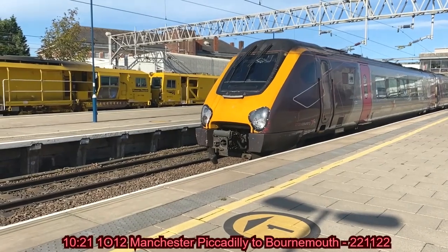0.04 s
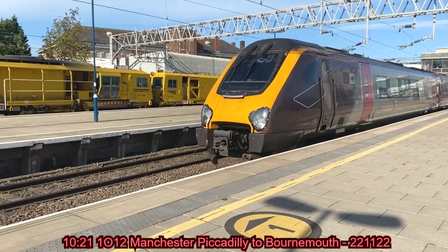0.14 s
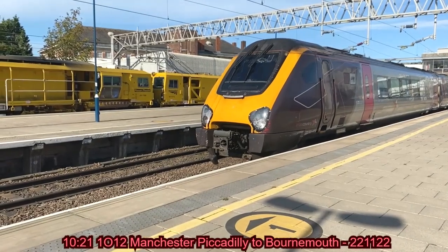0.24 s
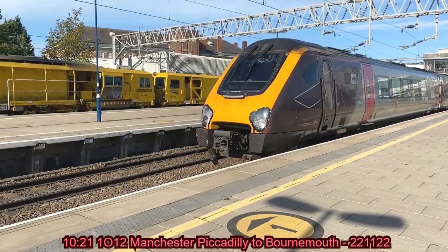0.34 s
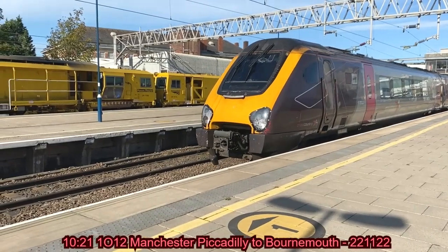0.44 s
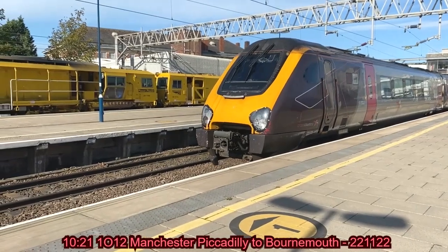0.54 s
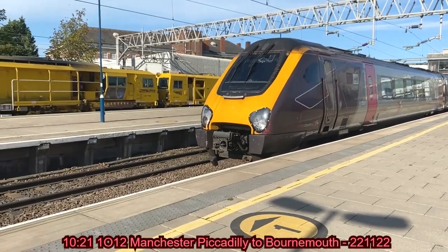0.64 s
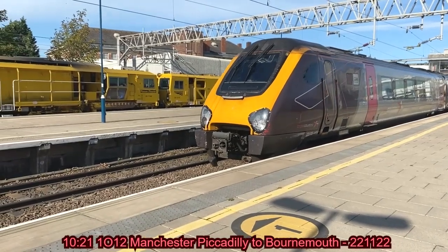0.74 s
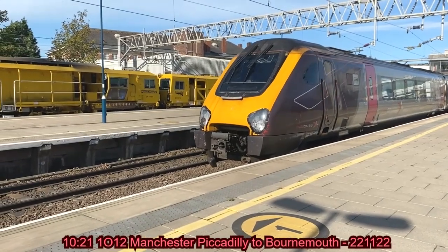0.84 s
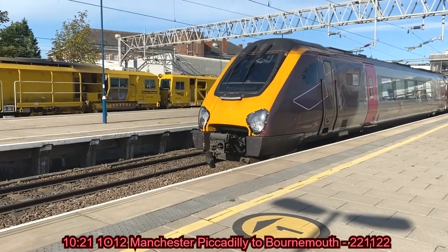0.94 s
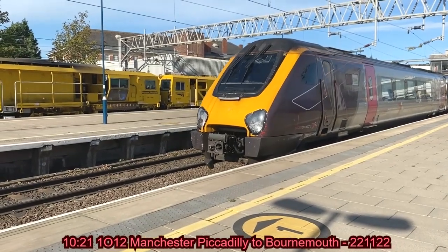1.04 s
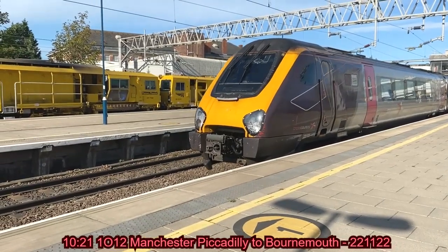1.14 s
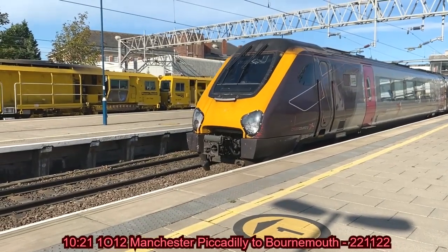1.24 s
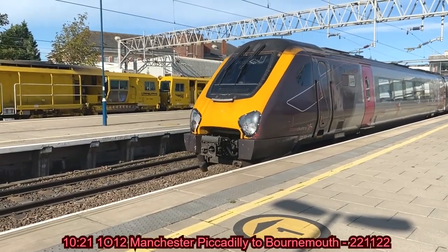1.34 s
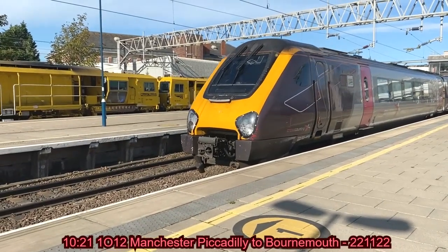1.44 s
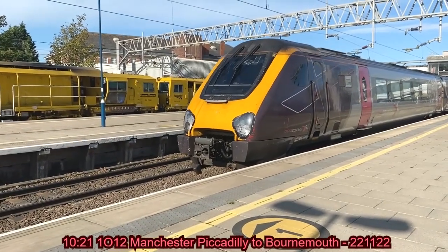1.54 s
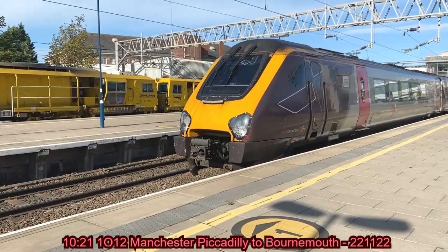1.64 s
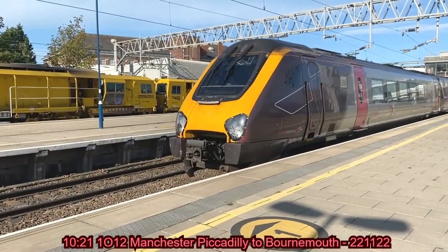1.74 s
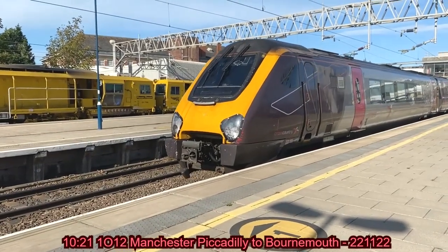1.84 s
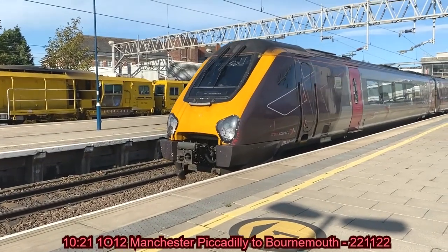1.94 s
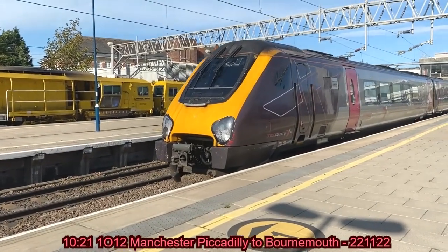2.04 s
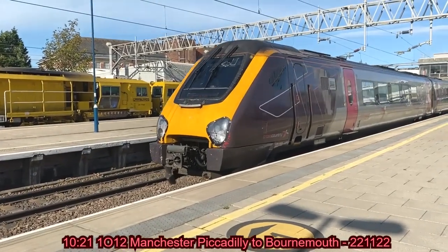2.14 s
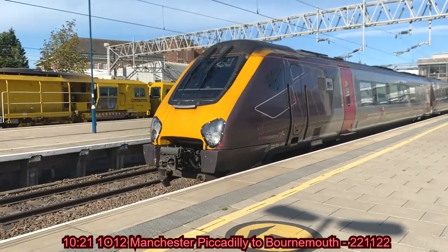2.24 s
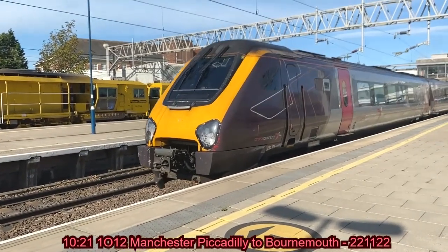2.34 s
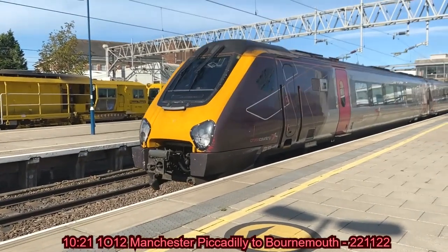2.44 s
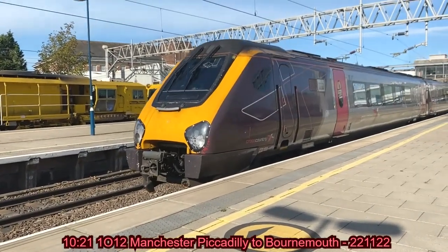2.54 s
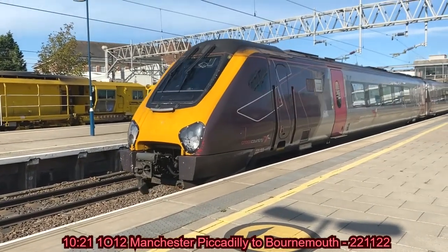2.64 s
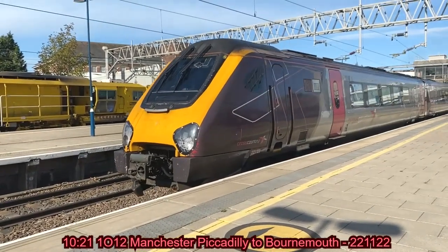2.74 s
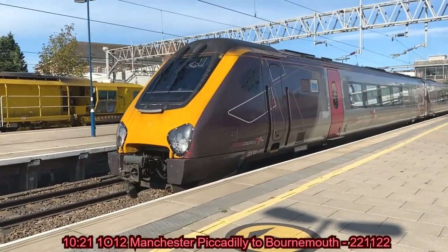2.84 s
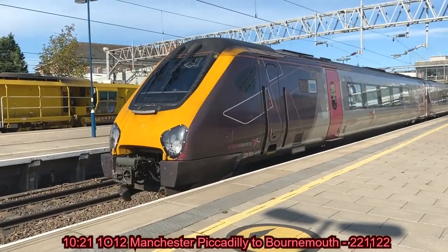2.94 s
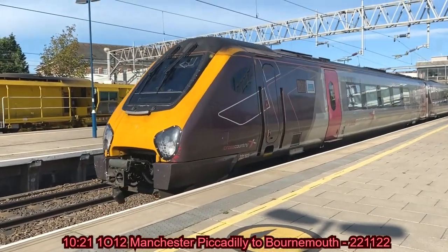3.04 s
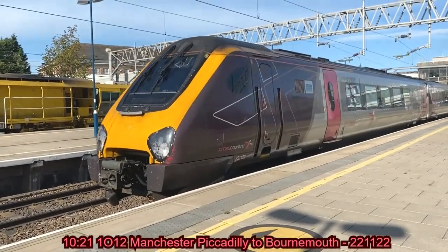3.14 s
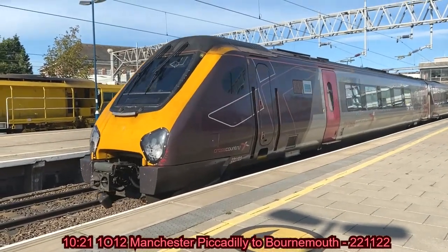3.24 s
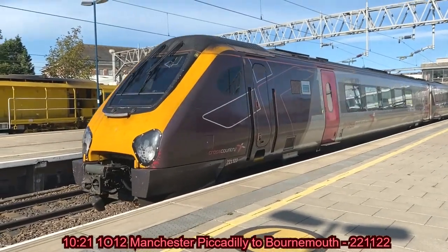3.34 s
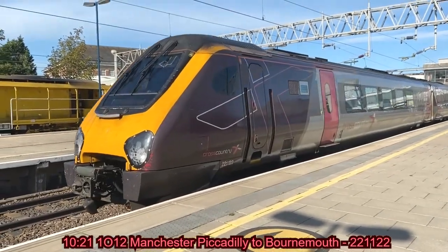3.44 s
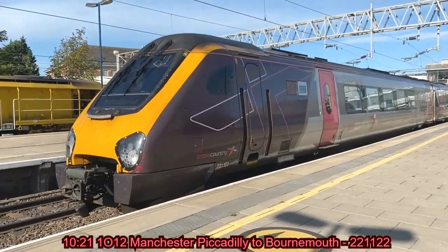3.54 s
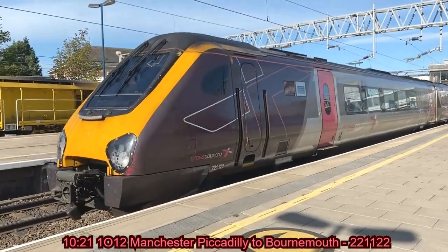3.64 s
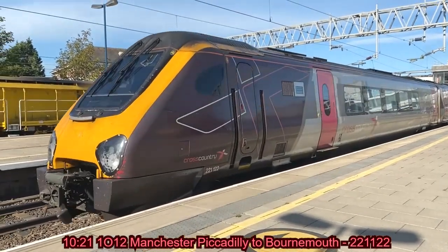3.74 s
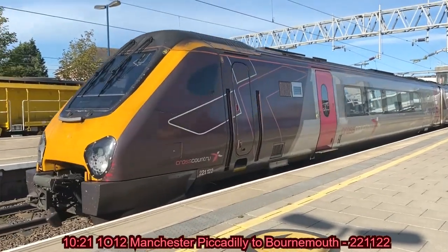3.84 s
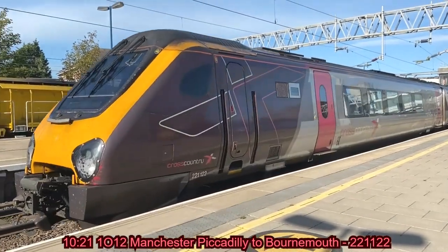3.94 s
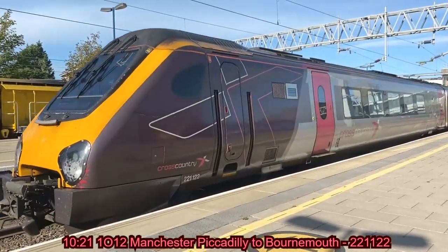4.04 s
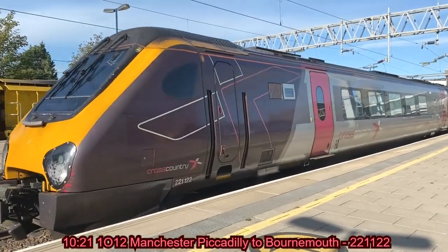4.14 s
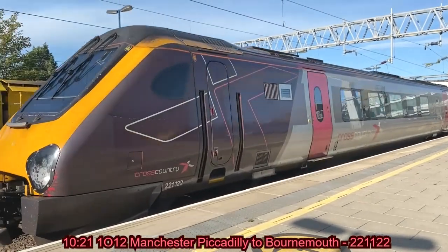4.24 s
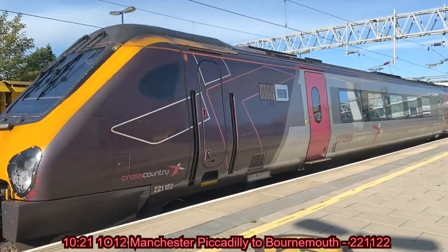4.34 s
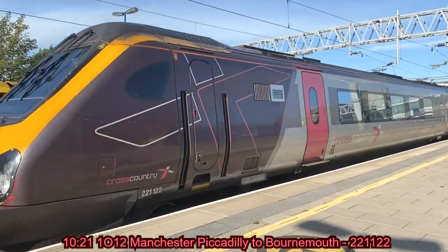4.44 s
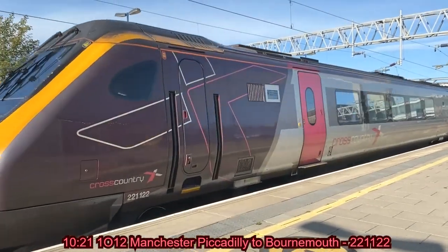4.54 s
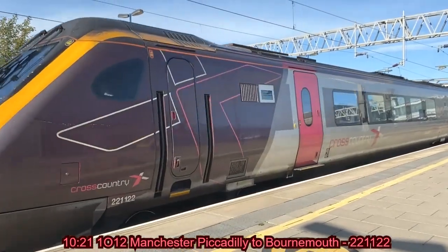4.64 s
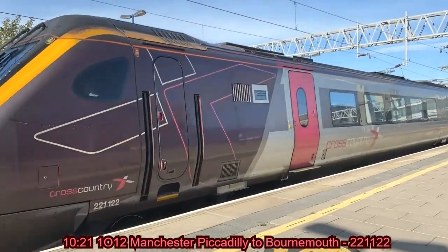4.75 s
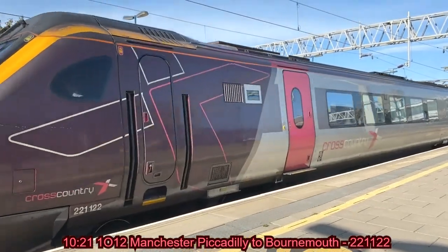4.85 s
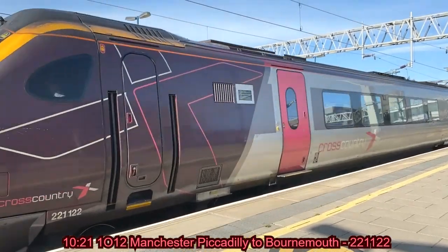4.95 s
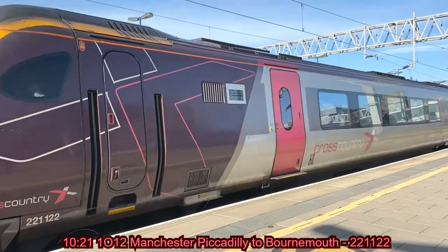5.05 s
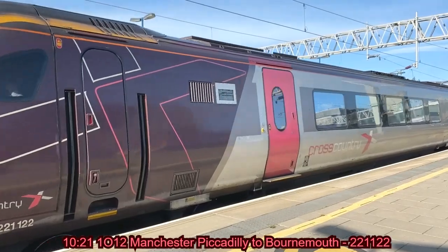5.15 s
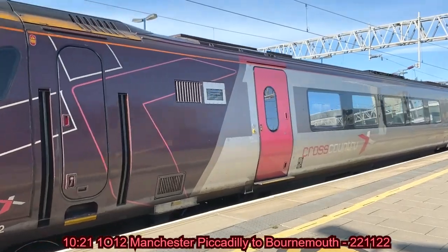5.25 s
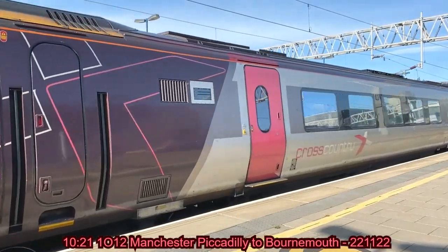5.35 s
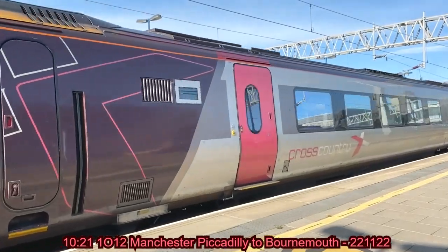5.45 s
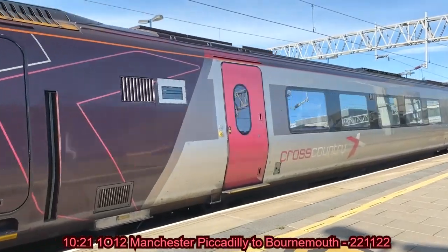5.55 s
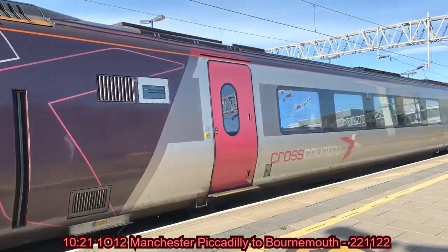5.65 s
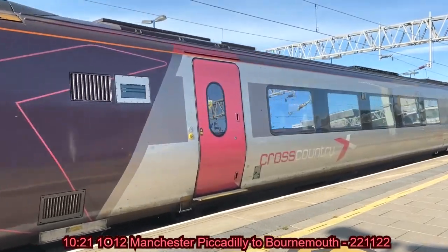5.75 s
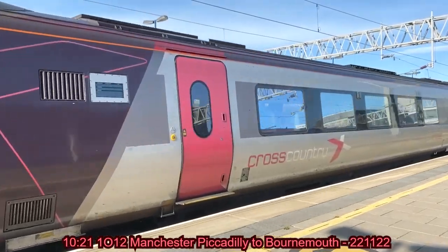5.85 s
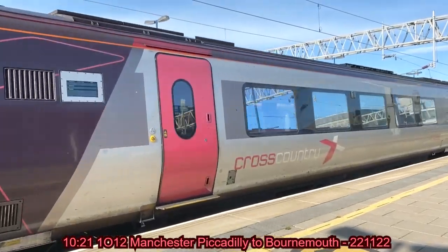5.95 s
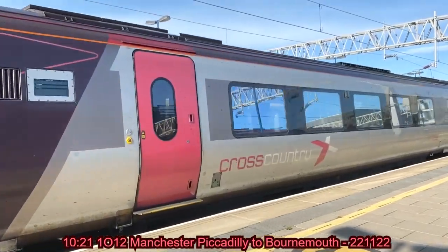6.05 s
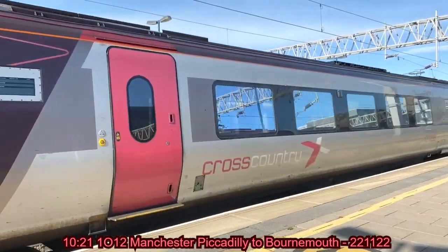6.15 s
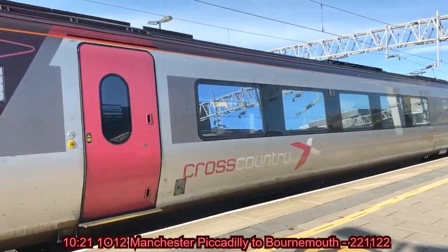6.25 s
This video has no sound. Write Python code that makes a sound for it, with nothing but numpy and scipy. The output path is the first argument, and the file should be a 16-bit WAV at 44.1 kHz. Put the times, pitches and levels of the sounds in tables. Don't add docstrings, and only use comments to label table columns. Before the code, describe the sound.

A diesel passenger train moves past a stereo listener on an open station platform. From 0 to 1 second its underfloor engines hold a low, heavy drone, nearly steady, over soft fan roar, faint machine whines and barely noticeable mains hum. From about 1 second the engines rev up, the pitch climbing smoothly by roughly a musical fifth by the end. The exhaust throbs irregularly: slightly mismatched engines beat together, with brief dips and swells and a rough, buzzing edge. Between 3.5 and 4.5 seconds the front draws close and the roar's colour shifts; the cooling tones fade while motor and gear whine rises slightly. The hum disappears by about 5 seconds. From 5 to 6.3 seconds the rumble, wide turbulent roar and high hiss swell strongest, the climb easing off as the sound ends mid-pass.

```python
import sys
import numpy as np
from scipy import signal
from scipy.io import wavfile
from scipy.ndimage import uniform_filter1d, minimum_filter1d

SR = 44100
rng = np.random.default_rng(int(sys.argv[2]) if len(sys.argv) > 2 else 0)


def convert_level_to_amplitude(level_db):
    exponent = np.asarray(level_db, float) / 20
    return 10 ** exponent


def bounce(signal):
    frames = np.transpose(np.atleast_2d(signal))
    limited = np.clip(frames, -1, 1)
    pcm = np.round(limited * 32767).astype(np.int16)
    wavfile.write(sys.argv[1], SR, pcm)


N = 277830
TIME = np.arange(N) / SR
HOP, WINDOW = 512, 2048
FRAMES, BIN_HZ = N // HOP + 5, np.fft.rfftfreq(WINDOW, 1 / SR)
FRAME_TIME = np.arange(FRAMES) * HOP / SR


def evened(x):
    return x / np.sqrt(np.mean(abs(x) ** 2) + 1e-20)


def read(points, hz):
    f, value = np.transpose(points)
    return np.interp(np.log(hz + 1), np.log(f + 1), value)


def curves(rows, t):
    s, *columns = np.transpose(rows)
    return [np.interp(t, s, column) for column in columns]


def wobble(width_hz):
    step = 64
    r = np.exp(-np.pi * width_hz * step / SR)
    z = rng.standard_normal((N // step + 2000, 2)) @ [1, 1j]
    z = signal.lfilter([1], [1, -2 * r, r * r], z)
    z = evened(z[1990:])
    return np.interp(np.arange(N) / step, np.arange(len(z)), z)


def resonance(modes, hz):
    return sum(top / (1 + (2 * (hz - f) / width) ** 2) for f, width, top in modes)


# t/s, firing rate f/Hz, load level/dB
REV = [(0, 57.05, -4.5), (.5, 57.52, -5), (1, 59.03, -3), (1.5, 62.37, -1), (2, 65.7, 0), (2.5, 68.6, -1.5),
       (3, 71.03, 0.5), (3.5, 72.44, -0.5), (4, 74.78, 1.5), (4.5, 77.05, 3), (5, 79.26, 0.5),
       (5.5, 82.34, 0), (6, 84.3, -0.5), (6.3, 84.6, -2.5)]
# t/s, lag/rad
PULSE_LAG = [(0, -.4), (1, -.5), (1.6, -1.3), (3.5, -2.1), (6.3, -1.8)]


def crank():
    hz, load_db = curves(REV, TIME)
    turn = 2 * np.pi * np.cumsum(hz) / SR
    return hz, load_db, turn, curves(PULSE_LAG, TIME)[0]


# f/Hz, width/Hz, level/dB
PIPE = [(75, 22, 1), (137.7, 15.4, 14), (158, 7, 3), (195.9, 24, 15), (243.8, 31.4, 17)]


def order_level(k, row, hz, load_db):
    db, pipe_share, load_share = row
    return db + pipe_share * resonance(PIPE, k * hz) + load_share * load_db


# level/dB between modes, share of the pipe lift, share of the load
FIRING = [
    (-16.5, 0.31, 1.33),
    (-17.5, 0.21, 1.57),
    (-30, 0.59, .6),
    (-41, 0.87, .1),
]


def firing_levels(hz, load_db):
    return [order_level(k, row, hz, load_db) for k, row in enumerate(FIRING, 1)]


# t/s, length/s, level/dB
BEATS = [
    [(.17, 0.11, -17), (.45, 0.065, -14), (1.27, 0.17, -7), (1.65, .2, 0), (2.03, 0.077, -16),
     (3.64, 0.11, -19.5), (4.22, 0.069, -23), (4.62, .08, -6), (5.1, 0.067, -2), (5.5, 0.09, -16),
     (5.72, 0.054, -6.5), (6, .4, 0)],
    [(1.4, 0.079, -3.5), (2.45, 0.033, -4.5), (3.05, 0.078, -14), (3.6, 0.37, 5), (4.5, 0.17, -3),
     (4.77, 0.085, -6.5), (5.15, 0.29, 7.5), (5.85, 0.14, -7)],
    [(.12, 0.069, -12), (.7, 0.37, 2.5), (1.62, .14, -4.5), (2.1, 0.26, 3), (2.85, 0.058, -13),
     (4.3, 0.26, -6.5), (5.02, 0.052, -17)],
    [(.75, .3, 2), (1.5, 0.27, -9), (5.7, 0.26, 9.5)],
]


def firing_orders(levels, turn, lag):
    out = np.zeros(N)
    for k, (db, beats) in enumerate(zip(levels, BEATS), 1):
        beat_db = sum(depth * np.exp(-((TIME - s) / length) ** 2) for s, length, depth in beats)
        unsteady = 1 + .04 * wobble(width_hz=6)
        out += convert_level_to_amplitude(db + beat_db) * (np.exp(1j * (k * turn + lag)) * unsteady).real
    return out


# t/s, speed over that of the front engines, level/dB below them
REAR = [(0, 0.98, -18), (1, 1, -8), (2, 0.97, -8.5), (3, 1, -12), (4, 0.96, -11.5), (5, 0.97, -11.5),
        (6.3, 0.96, -10.5)]


def rear_engine(levels, hz):
    slower, under_db = curves(REAR, TIME)
    behind = 2 * np.pi * np.cumsum(hz * slower) / SR
    out = np.zeros(N)
    for k, db in enumerate(levels[:3], 1):
        first_cut_db = 4.7 * (k == 1)
        unsteady = 1.13 + .5 * wobble(width_hz=1.3)
        out += convert_level_to_amplitude(db + under_db - first_cut_db) * (np.exp(1j * k * behind) * unsteady).real
    return out


# level/dB between modes, share of the pipe lift, share of the load
THIRDS = [
    (-39, 0.97, 0.65),
    (-46, 1.31, 0.079),
    (-37.5, 0.82, 0.43),
    (-40.5, 0.91, 0.41),
]


def crank_orders(hz, load_db, turn, lag):
    scatter = np.clip(1.2 - TIME / 4, .35, 1)
    out = np.zeros(N)
    for k, row in zip((5 / 3, 7 / 3, 8 / 3, 10 / 3), THIRDS):
        phase = k * turn + lag + scatter * rng.uniform(-np.pi, np.pi)
        out += convert_level_to_amplitude(order_level(k, row, hz, load_db)) * np.cos(phase)
    return out


# f/Hz, width/Hz, level/dB
SILENCER = [(197.8, 10.9, 9), (237, 16, 7), (323.3, 7.2, 1.5)]
# sixths of the firing rate, level/dB
UNEVEN = [(3, -46.5), (4, -39), (5, -35), (7, -47.5), (8, -55), (9, -40.5), (11, -45.5), (13, -52),
          (15, -43.5), (17, -38), (19, -49), (21, -42), (22, -43), (23, -46), (26, -45.5), (28, -50),
          (30, -46.5), (36, -45.5)]


def uneven_orders(hz, turn):
    out = np.zeros(N)
    for sixths, db in UNEVEN:
        k = round(sixths) / 6
        swing = np.exp(1j * (k * turn + 2 * np.pi * rng.random()))
        unsteady = .85 + .5 * wobble(width_hz=1.4)
        out += convert_level_to_amplitude(db + resonance(SILENCER, k * hz)) * (swing * unsteady).real
    return out


def engines():
    hz, load_db, turn, lag = crank()
    levels = firing_levels(hz, load_db)
    out = firing_orders(levels, turn, lag) + rear_engine(levels, hz)
    out += crank_orders(hz, load_db, turn, lag) + uneven_orders(hz, turn)
    return np.sqrt(2) * out


# t/s, roar level/dB, nearness of the first engine (0-1)
PASS = [(0, -31.5, 0.08), (.8, -31.5, 0), (2.4, -30.5, 0), (3.2, -30, 0.05), (3.7, -29.5, 0.24),
        (4.2, -29, 0.76), (4.7, -29, 0.65), (5.2, -27, 0.82), (5.7, -27, 0.85), (6.3, -24.5, 0.85)]


def passing(t):
    roar_db, near = curves(PASS, t)
    return roar_db, np.clip(near, 0, 1), roar_db + 32


def field(patchy_db):
    a, b, patches, ridges = rng.standard_normal((FRAMES, len(BIN_HZ), 4)).T
    patches = uniform_filter1d(uniform_filter1d(patches, size=7, axis=0), size=14, axis=1)
    ridges = uniform_filter1d(uniform_filter1d(ridges, size=3, axis=0), size=40, axis=1)
    return (a + 1j * b) * convert_level_to_amplitude(patchy_db * evened(patches) + 1.8 * evened(ridges))


def levelled(shape, db):
    return shape / np.linalg.norm(shape, axis=0) * convert_level_to_amplitude(db)


def blend(far, close, near):
    return convert_level_to_amplitude(read(far, BIN_HZ)[:, None] * (1 - near) + read(close, BIN_HZ)[:, None] * near)


# f/Hz, level/dB per Hz
FAR_MID = [(160, -40), (280, -11), (392, -1.5), (529, -11), (629, -22), (838, -5.5), (1100, -12.5),
           (1400, -22), (1710, -16), (2100, -23), (2570, -20), (2840, -27.5), (3060, -25), (5500, -37.5),
           (7150, -56), (12000, -120)]
NEAR_MID = [(160, -37), (280, -8), (329, -2.5), (407, -8.5), (556, -13), (740, -25.5), (859, -19),
            (926, -26), (1020, -16), (1170, -17), (1560, -25), (2060, -27), (2770, -31.5), (3300, -33.5),
            (5500, -43), (7150, -73), (12100, -120)]
FAR_SIDE = [(35, -32.5), (60, -5.5), (76, -2.5), (91, -16.5), (133, -5.5), (159, -5.5), (194, -4.5),
            (390, -12), (440, -21.5), (815, -9.5), (918, -13.5), (1740, -21.5), (2340, -26), (2640, -26),
            (7000, -45), (9100, -75.5), (15400, -120)]
NEAR_SIDE = [(35, -39.5), (60, -7), (88, -5), (111, -21), (153, -1), (247, -1), (505, -16.5), (558, -15),
             (723, -18.5), (1540, -21.5), (1840, -24.5), (2800, -30), (7000, -47), (9100, -70.5),
             (15400, -120)]
# f/Hz, likeness
LEAN = [(200, -.2), (400, -.2), (700, .3), (1300, 0.24), (2400, .06), (4400, .1), (8000, 0)]


def roar(roar_db, near):
    one, other = field(.7), field(.7)
    widening = -.5 * np.sin(2 * np.pi * (BIN_HZ - 650) / 730) * (BIN_HZ > 300) * (BIN_HZ < 3600)
    lean = np.clip(read(LEAN, BIN_HZ), -.6, .6) + 1j * np.clip(widening, -.7, .7)
    lean = lean[:, None]
    mid = levelled(blend(FAR_MID, NEAR_MID, near), roar_db + .5) * one
    mixed = lean * one + np.sqrt(1 - abs(lean) ** 2) * other
    side = levelled(blend(FAR_SIDE, NEAR_SIDE, near), roar_db - .5) * mixed
    return np.array([mid + side, mid - side])


# f/Hz, level/dB per Hz
RUMBLE = [(20, -58), (40, -15), (55, -3), (90, -2), (140, -1), (200, 0), (260, -3), (320, -10), (420, -30),
          (600, -70)]


def rumble(rise_db):
    return levelled(convert_level_to_amplitude(read(RUMBLE, BIN_HZ))[:, None], -28 + .9 * rise_db) * field(.3)


# f/Hz, level/dB per Hz
HISS = [(4000, -35.5), (5200, 7.5), (6500, 8.5), (8000, 6.5), (11000, 2), (14000, -1), (15500, -5),
        (15800, -58.5)]


def hiss(rise_db):
    sound = levelled(convert_level_to_amplitude(read(HISS, BIN_HZ))[:, None], -56.5 + 1.46 * rise_db) * field(1.1)
    lead = np.exp(-1j * np.pi * (BIN_HZ - 6900) / 4250)[:, None]
    return np.array([sound * lead, sound / lead])


def broadband():
    roar_db, near, rise_db = passing(FRAME_TIME)
    z = roar(roar_db, near) + rumble(rise_db) + hiss(rise_db)
    return 1.241 * signal.istft(z, nperseg=WINDOW, noverlap=WINDOW - HOP)[1][:, :N]


def whine(hz, db, width_hz):
    carrier = np.sqrt(2) * convert_level_to_amplitude(db) * np.exp(2j * np.pi * np.cumsum(hz) / SR)
    mid, side = wobble(width_hz), .6 * wobble(width_hz)
    return (carrier * np.array([mid + side, mid - side])).real


# t/s, f/Hz, level/dB
TURBO = [(0, 3669, -56), (1.3, 3810, -62.5), (3.2, 4250, -79.5), (4.3, 4770, -64), (5.4, 5500, -63),
         (6.3, 5614, -58)]
# first f/Hz, last f/Hz, width/Hz, far level/dB, near level/dB
WHINES = [
    (2653, 2740, 52, -56, -56),
    (5420, 5480, 80, -74, -72),
    (1051, 1590, 110, -79, -46.5),
    (737, 1200, 110, -64.5, -47),
    (1714, 1755, 92, -48, -76),
    (2597, 2570, 220, -53, -74.5),
    (3020, 3200, 120, -55, -73),
    (823.5, 845, 60, -45, -72),
]


def whines():
    _, near, rise_db = passing(TIME)
    out = whine(*curves(TURBO, TIME), 90)
    for first, last, width_hz, far_db, near_db in WHINES:
        db = far_db + (near_db - far_db) * near + 1.56 * rise_db
        out += whine(np.linspace(first, last, N), db, width_hz)
    return out


# f/Hz, level/dB, t/s when the cab screens it
HUM = [
    (50, -32, 4.9),
    (99.3, -31, 2.1),
]


def hum():
    out = np.zeros(N)
    for f, db, s in HUM:
        out += convert_level_to_amplitude(db) * np.clip(2 * (s - TIME), 0, 1) * np.sin(2 * np.pi * f * TIME)
    return np.sqrt(2) * out


def scene():
    balance = convert_level_to_amplitude(np.array([[-.3], [.3]]))
    return (engines() + hum()) * balance + broadband() + whines()


def low_pass(x):
    return signal.sosfilt(signal.butter(12, 16690, fs=SR, output="sos"), x)


def record(dry):
    room = np.minimum(1, .91 / (abs(dry).max(0) + 1e-9))
    gain = uniform_filter1d(minimum_filter1d(room, size=1601), size=1601)
    fades = signal.windows.tukey(N, .002)
    band = signal.firwin(255, 15750, window=("kaiser", 9), fs=SR)
    mix = signal.oaconvolve(dry * gain * fades, band[None], "same")
    return low_pass(mix)


dry = scene()
out = record(dry)
bounce(out)
```